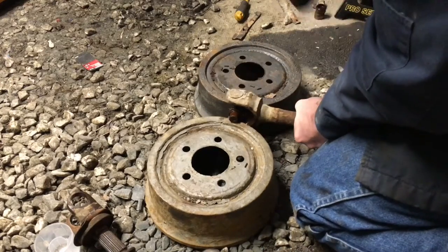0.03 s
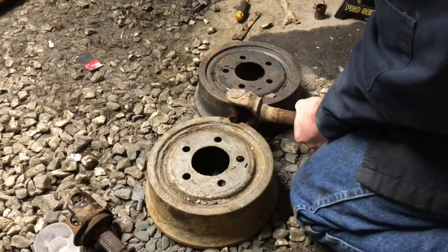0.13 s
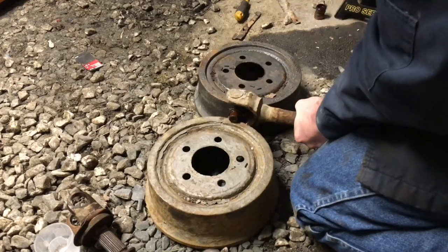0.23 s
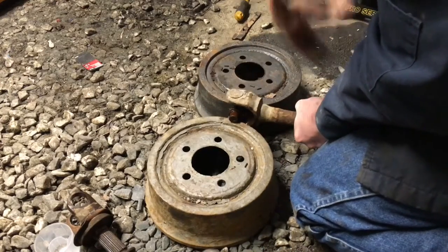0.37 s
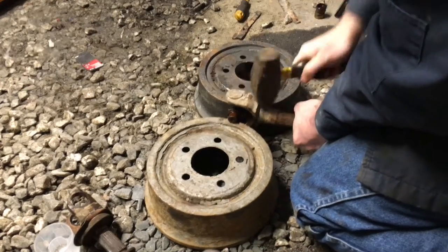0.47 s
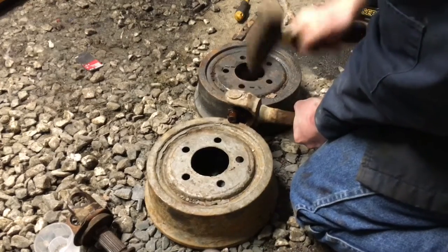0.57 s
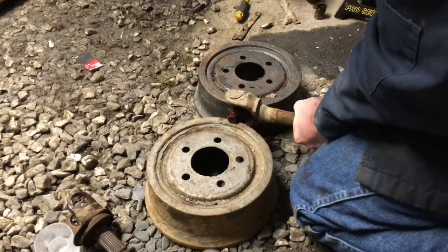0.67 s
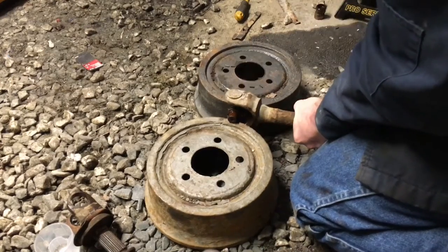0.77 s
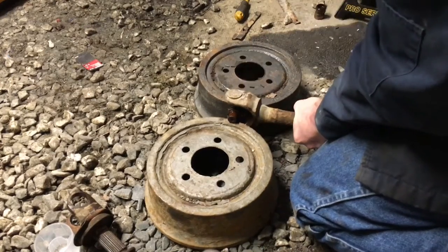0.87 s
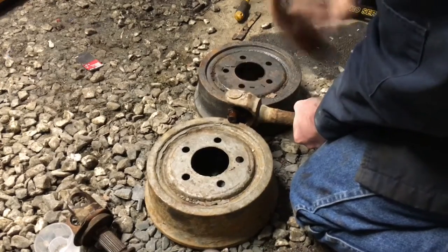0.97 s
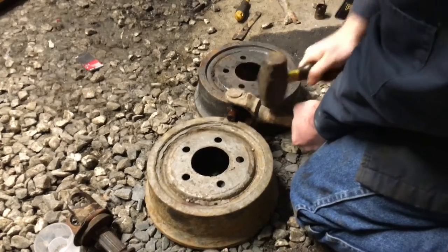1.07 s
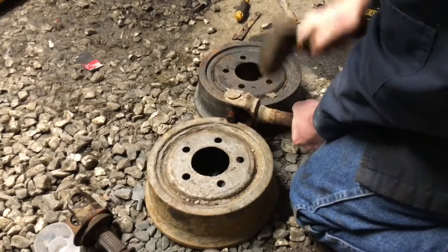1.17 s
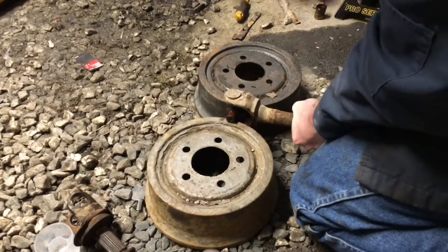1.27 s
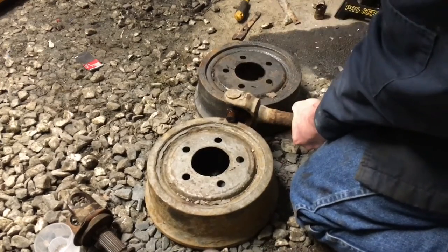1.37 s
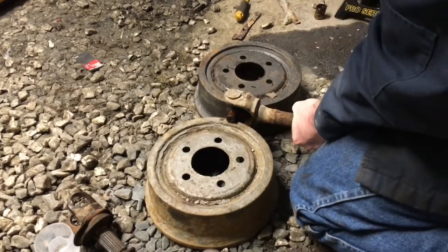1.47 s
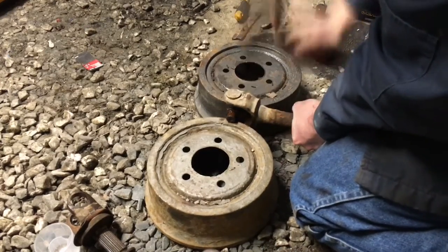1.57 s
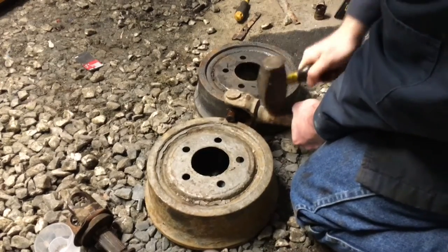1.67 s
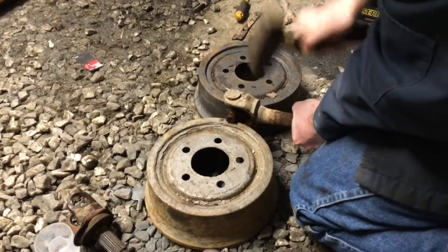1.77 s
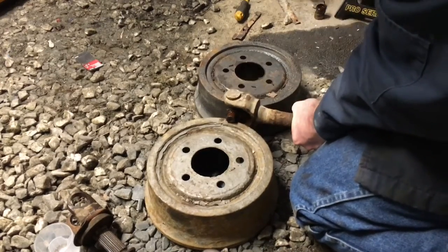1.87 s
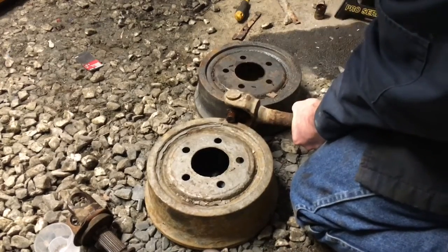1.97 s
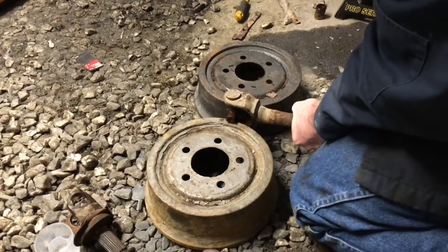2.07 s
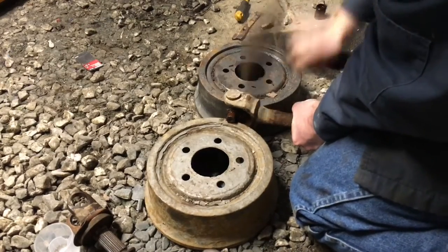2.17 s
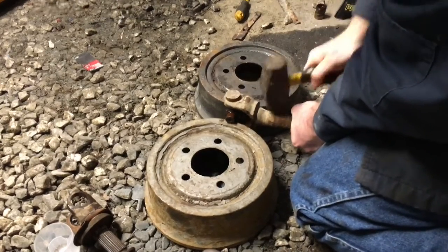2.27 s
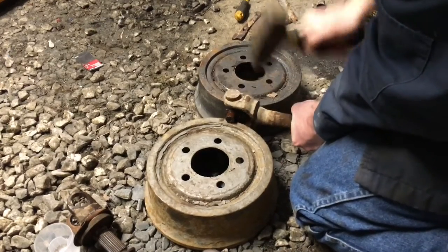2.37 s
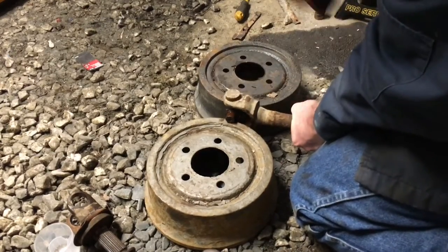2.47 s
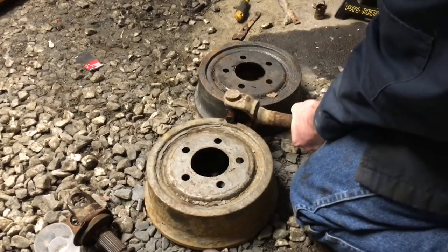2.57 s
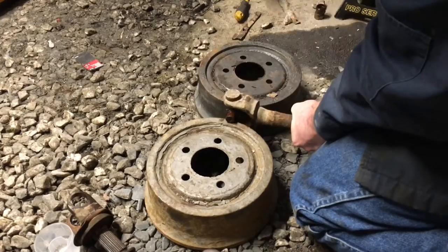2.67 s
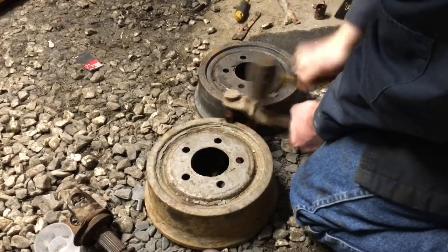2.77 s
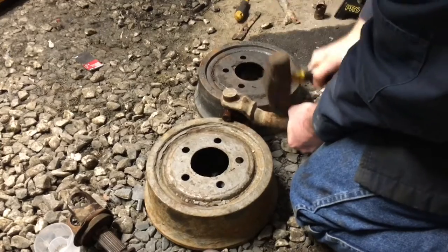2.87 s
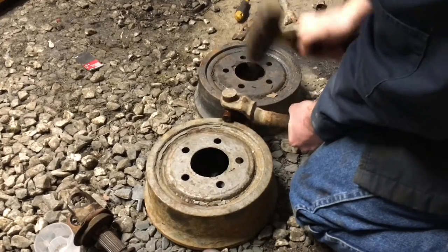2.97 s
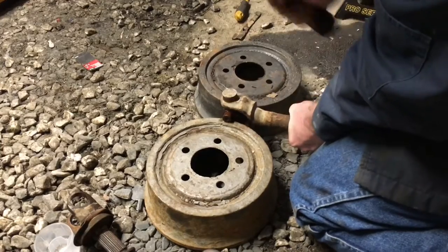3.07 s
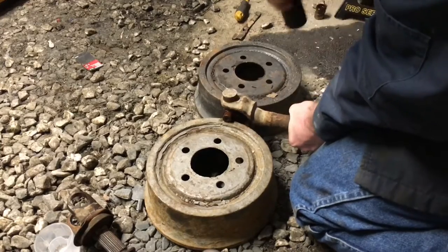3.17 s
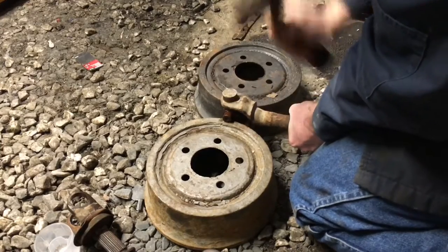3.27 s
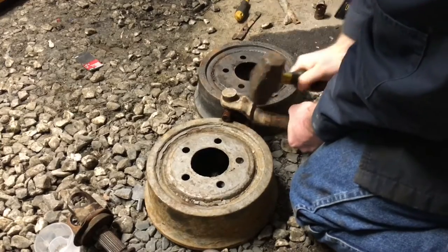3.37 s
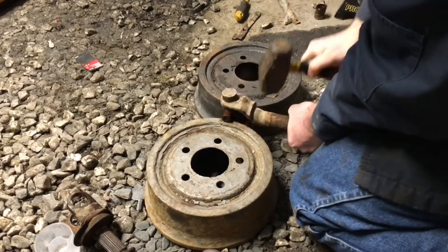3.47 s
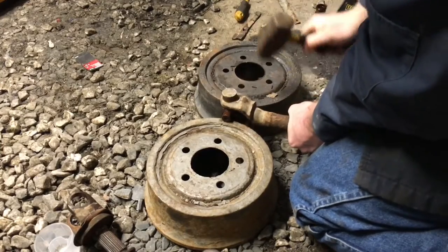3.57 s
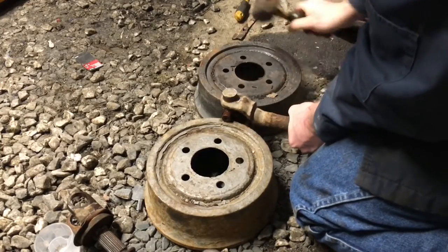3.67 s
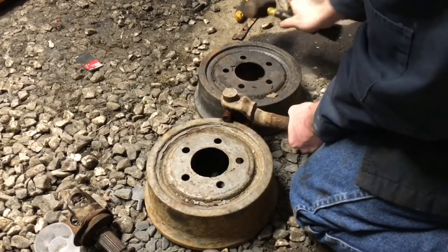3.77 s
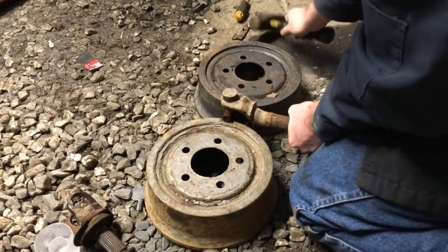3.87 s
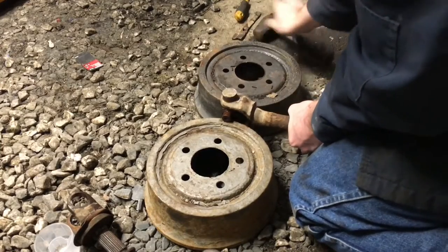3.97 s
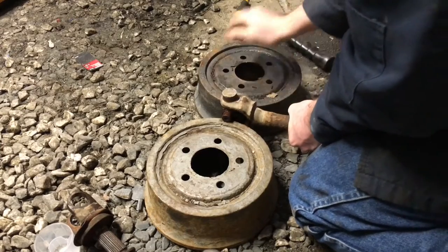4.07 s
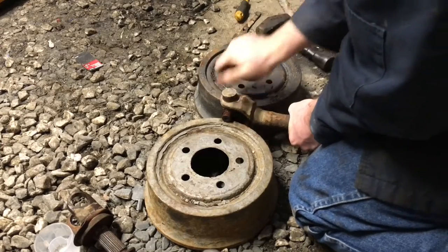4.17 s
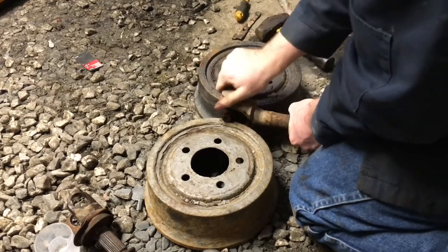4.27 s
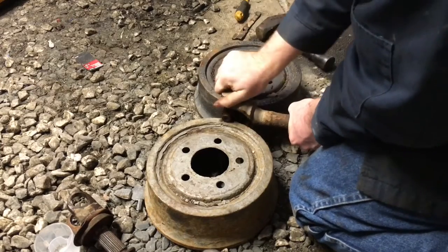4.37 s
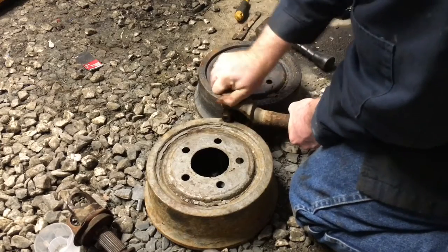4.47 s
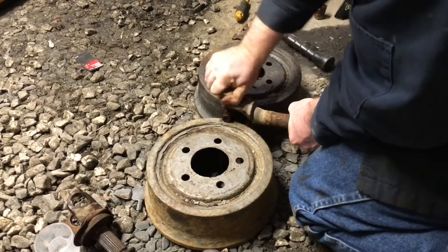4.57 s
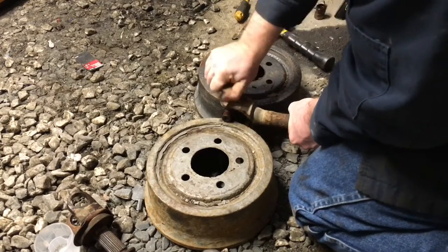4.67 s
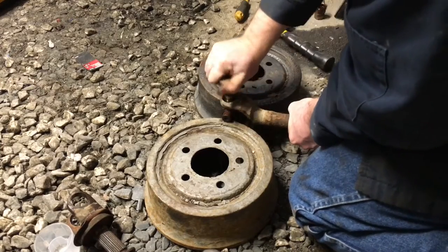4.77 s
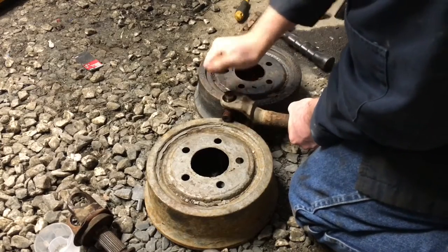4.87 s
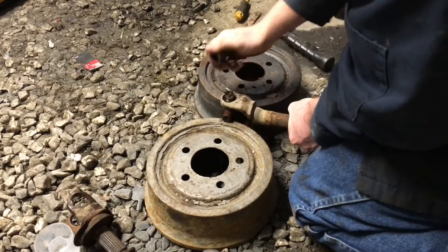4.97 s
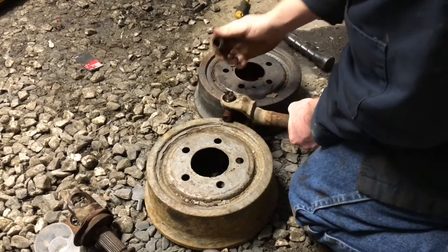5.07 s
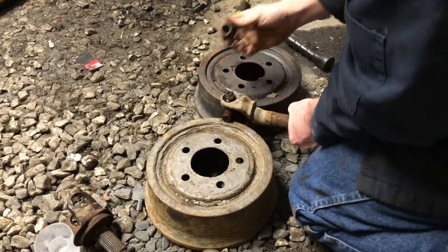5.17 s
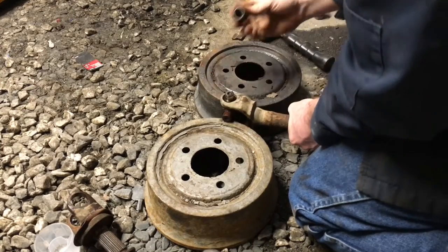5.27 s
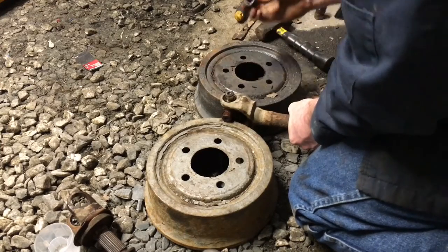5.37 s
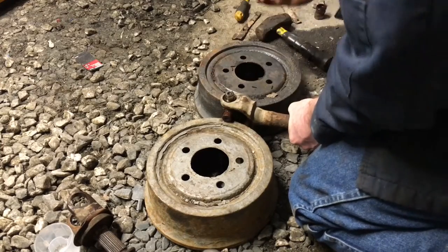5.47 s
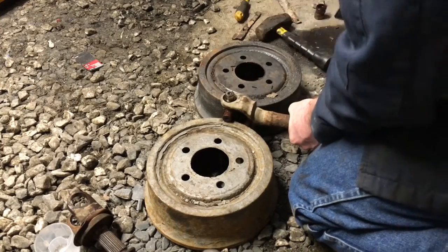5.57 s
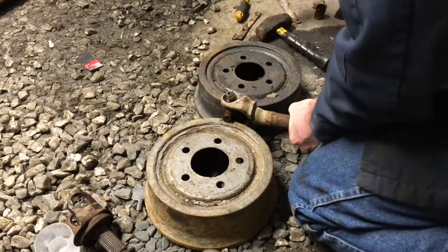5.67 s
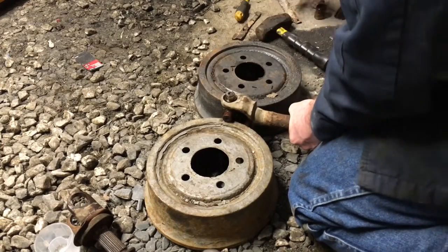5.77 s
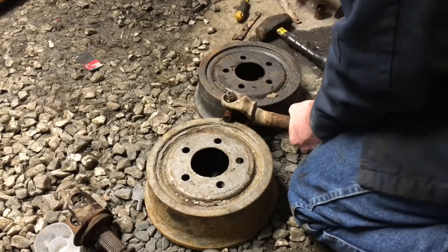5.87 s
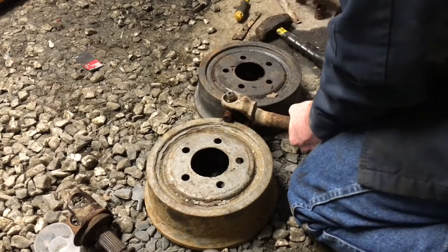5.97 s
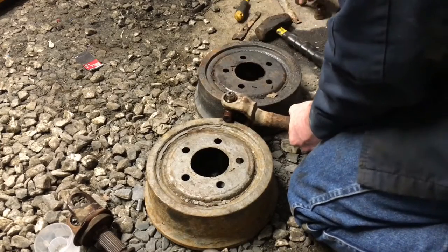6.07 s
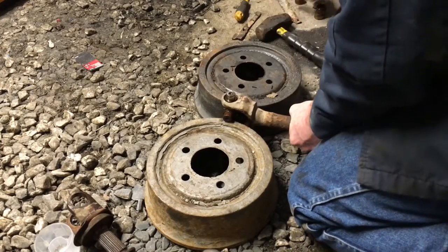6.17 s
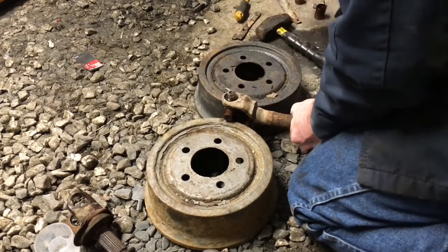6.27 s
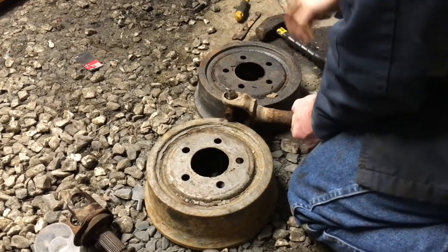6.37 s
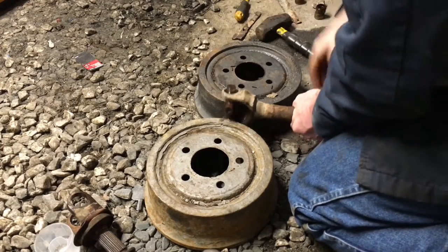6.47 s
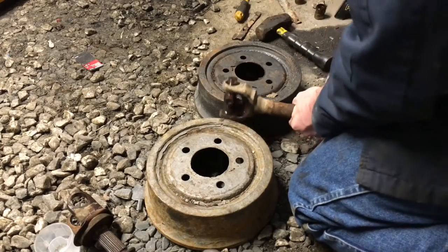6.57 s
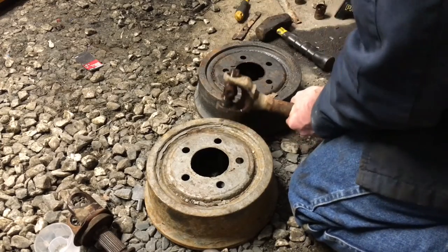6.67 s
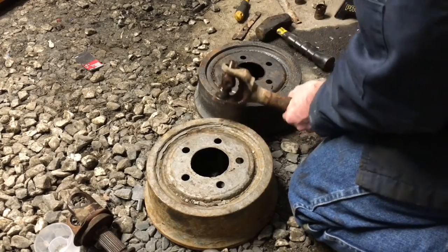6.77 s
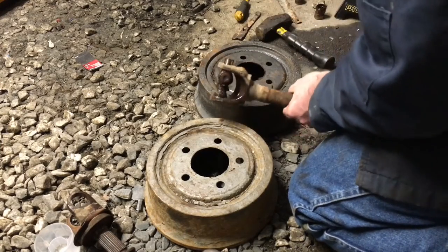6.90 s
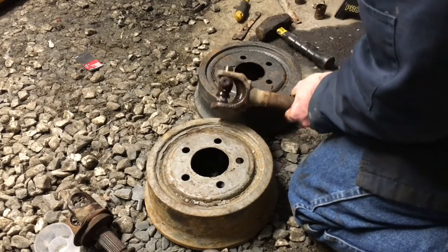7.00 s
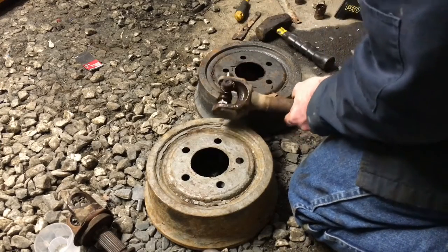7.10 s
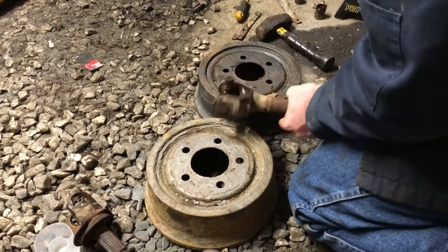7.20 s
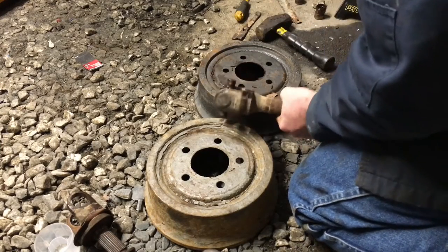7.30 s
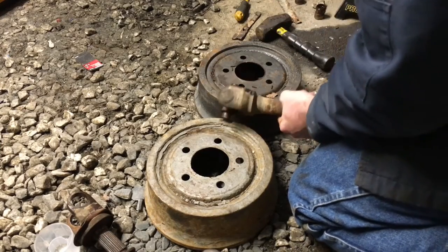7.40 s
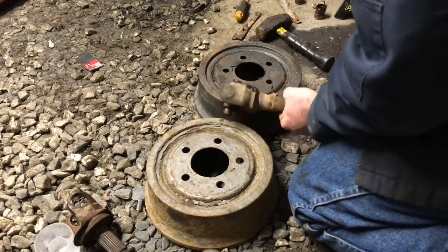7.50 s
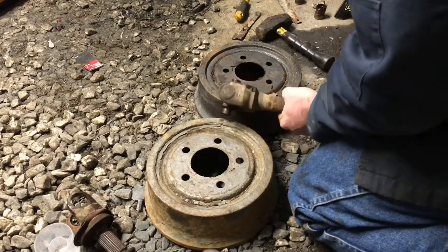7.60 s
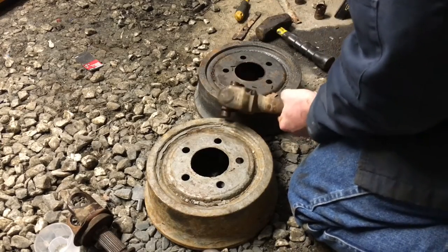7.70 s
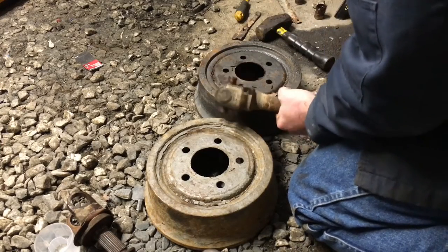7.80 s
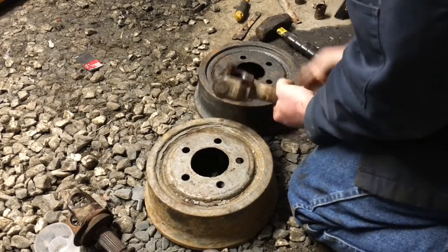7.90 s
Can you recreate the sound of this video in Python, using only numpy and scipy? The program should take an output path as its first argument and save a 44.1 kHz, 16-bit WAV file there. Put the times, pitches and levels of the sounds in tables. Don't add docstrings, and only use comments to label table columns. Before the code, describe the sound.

Outdoors, a heavy hammer clangs steel over iron drums six times, is dropped with a crunch, then quiet rustling and a single lighter clink.

```python
import sys
import numpy as np
from scipy import signal
from scipy.fft import rfft, irfft, next_fast_len
from scipy.io import wavfile
from scipy.ndimage import uniform_filter1d, minimum_filter1d, map_coordinates

SR = 44100
rng = np.random.default_rng(int(sys.argv[2]) if len(sys.argv) > 2 else 0)


def rack_gain(trim_db):
    fader = np.asarray(trim_db, float)
    return 10 ** (fader / 20)


def transcribe(u):
    v = np.clip(np.atleast_2d(u).T, -1, 1)
    q = np.round(v * 32767).astype(np.int16)
    wavfile.write(sys.argv[1], SR, q)


N = 350147
T = np.arange(N) / SR
PAD = SR // 5
WALL_WET_DB = -10

# (time [s], peak [dB], brightness [dB/octave], thud [dB], early leak [dB])
BLOWS = [
    (-.09, -17, -1.5, -13.5, -26),
    (0.498, -7, 0, 1.5, -24.5),
    (1.096, -4.5, 0, 3, -32.5),
    (1.6836, -5.5, 0, 0, -25),
    (2.274, -8, 1, -1.5, -30),
    (2.860, -3, -1, 4.5, -32.5),
    (3.423, -8, -1.5, 1, -26),
]
LANDINGS = [(2.52, -0.2, -1.11, 0.07), (0.13, 0.5, 1.04, -1.7), (-1.28, 1.09, -1.77, 0.73),
            (-0.35, 1.19, -0.11, -0.9), (-0.35, -1.44, 0.09, 1.21), (0.19, 0.73, 1.88, 1.54),
            (-0.87, -1.87, -0.04, -0.95)]
# (length [s], loudest loose part [Hz], its level [dB], its t60 [s])
RATTLE = [(0.016, 8450, -56, 0.79), (0.03, 1700, -17.5, 0.15), (0.022, 5470, -21.5, 0.24),
          (0.019, 5939, -23, 0.16), (0.021, 5064, -25.5, 0.25), (0.012, 3540, -9, 0.12),
          (0.03, 2900, -23.5, 0.15)]
# (lift [s], landing [s], damping after landing [ratio])
HOPS = [(0.145, 0.29, 1.8), (.16, 0.266, 1.9), (0.169, 0.316, 1.57), (0.177, 0.258, 1.5), (.17, 0.259, 1.9),
        (.15, .29, 1.4), (0.161, 0.3, 1.43)]
GRIPS = [(0.91, 1.06, 0.23, 1.78), (-1.68, -1.76, 0.73, 0.58), (-0.9, 0.37, -2.59, -0.05),
         (1.58, -1.36, -0.2, -1.46), (-1.13, 1.36, 1.22, -1.16), (0.68, -0.5, 0.34, 1.15),
         (0.54, 0.83, 0.26, -0.84)]
# (frequency [Hz], change [dB])
CONTACT = [
    [(3155, -8), (5668, -8)],
    [(1926, 1), (3239, 5), (5470, 3), (967.5, -2), (1266.5, 2), (4095, -2), (2357, 3), (3155, -2)],
    [(1926, 9), (3155, 4), (1325, 3), (2834, 5), (4095, 8), (5470, 3), (3239, 1.5), (9645, -8)],
    [(1926, 7), (3239, 3), (5668, 6), (5750, 8), (3123, 6), (5939, 6), (2834, 3), (3866, 4), (5470, 5)],
    [(1926, -5), (4095, 6), (3239, -3), (5668, -13), (7385, 9), (3123, 7), (2319, -3), (3866, -10),
     (5470, 3)],
    [(1926, -5), (3155, -14), (5668, -15), (4208, 2), (2357, 5), (3866, 11), (4095, -5), (2834, 5)],
    [(3239, 8), (2834, 4), (3155, 5), (5668, -14), (5939, 7), (5470, -6), (5750, 4), (4095, 3), (4208, -3)],
]


def hammer():
    out = np.zeros(N + PAD)
    for blow, landing, rattle, hop, grip, contact in zip(BLOWS, LANDINGS, RATTLE, HOPS, GRIPS, CONTACT):
        s, db, tilt_db, thud_db, leak_db = blow
        answer_db = mode_answers(landing, grip, contact)
        crash = steel_crash(db, tilt_db, rattle[0], answer_db)
        add(out, s, crash)
        add(out, s, rack_gain(db + 2) * crack(t60=.008))
        add(out, s, drums(answer_db, rattle, hop))
        add(out, s, thud(thud_db))
        for lead, more_db in (1024, 0), (512, -3):
            fade = .4 + 1.6 * np.exp(-np.arange(lead) / SR / .004)
            add(out, s - lead / SR, rack_gain(leak_db + more_db) * crash[:lead] * fade)
    return out[PAD:]


# (frequency [Hz], twin gap [Hz], beat start [cycles])
DRUMS = [(156, .3, 0), (320, .3, 0), (934, .3, 0), (967.5, .8, 0), (1266.5, .3, 0), (1302, .3, 0),
         (1325, 4.25, -.25), (1652, 4, 0), (1926, 2.8, 0), (2009, .5, 0), (2319, 5, 0), (2357, .5, 0),
         (2593, 2, 0), (2834, 9.5, .3), (3123, .5, 0), (3155, 2.6, 0), (3239, .5, 0), (3866, 9, 0),
         (4095, 3.4, 0), (4208, 2, 0), (5064, 3, 0), (5470, 2, 0), (5668, 2, 0), (5750, 2, 0), (5939, 2, 0),
         (6385, 2, 0), (7385, 2, 0), (7740, 2, 0), (372, 2, 0), (9645, 2, 0), (924, 1.7, 0), (1261, .3, 0),
         (1801, 2, 0), (3490, 4, 0)]
# (usual [dB], glance [dB/cm], toward [dB/cm], along [dB/cm], across [dB/cm])
LANDING_ANSWERS = [(-5, -3.5, 2, 0.2, -2.5), (0, -3.3, 1.5, 1.3, 0), (-2.5, -1.5, 1, -0.8, -0.1),
                   (0.37, -0.22, -0.8, 0, 0), (-0.3, -1.1, 0.4, 2, 0.6), (-3.5, 1.67, 1.9, -0.44, -2),
                   (-6.5, -1, -1.7, 0.2, 0.5), (-5, -3.5, 1.5, 1, -0.5), (-6, -1.5, 0, 4.3, -1),
                   (-6, 1, 0.5, -0.5, 1.45), (-1, -5.5, -2.2, 2.5, 2.1), (-7.5, -5.5, -2.4, -3, 4),
                   (-5.5, -2.5, 0.5, -1.5, 2.06), (-4.5, -3, -0.85, 0.5, -3), (-2.5, -0.5, -5, 0, -1.5),
                   (-4, 1.6, -1, 2.84, 0.05), (-7, 0, -2.46, -2, 0), (-2.5, -3.5, 0.85, -1.64, 0),
                   (-2.5, 0, -1, 7, -4), (-11, -4, -3.0, 3.5, 1), (-5.4, -2, 0.7, -1.5, -1.4),
                   (-7, -2.5, 2.5, 1.5, 4), (0.5, -3, -6, 1, 6), (0.0, -2.5, 0, 3, 1.6),
                   (-2, -5.5, 3, -1.5, 1.6), (-5.5, -5, 1.6, 1.56, 0.5), (-3.5, -2, 2.3, -2, 1),
                   (-4, -5.5, 3, 0.5, 4.5), (-2.5, 0.63, 2, 2.5, 0.2), (-7.5, -7, -3.5, -5.5, -0.4),
                   (-1.5, -1.5, 3.5, 0, -2), (4, -0.5, 1, 0.5, -0.5), (-8.5, -9, -1.5, 4, -4.5),
                   (-1.5, -2, 1, -1.5, -1.2)]
# (usual [dB], squeeze [dB/step], twist [dB/step], lean [dB/step], slide [dB/step])
GRIP_ANSWERS = [(-1.6, -0.3, -0.3, 0.0, -0.4), (-1.3, 0.5, 0.1, -0.3, 0.8), (-3.0, 0.1, -0.3, 0.7, 1.1),
                (-0.0, 2.9, 0.8, -0.4, -0.5), (0.1, 0.3, -0.8, 0.7, -0.6), (-1.2, -0.1, -0.4, 0.7, -0.4),
                (-1.0, -2.5, -1.2, 0.2, -0.2), (0.0, -1.4, -1.4, -0.7, -0.5), (1.1, 0.9, 0.1, -1.9, 0.3),
                (3.9, 0.2, -1.6, -0.3, 0.3), (-2.2, -0.6, -0.2, -0.2, 0.7), (-1.2, 0.5, 1.4, 0.5, -0.3),
                (-2.7, 1.3, -0.3, 0.7, 0.6), (-1.1, -1.7, 1.5, -0.4, 0.9), (2.0, 0.2, 0.5, -0.2, -1.2),
                (1.9, 0.3, 0.6, -0.2, -0.3), (-0.0, 2.3, -0.8, -2.3, -0.5), (0.6, 1.6, 0.0, -0.7, 2.4),
                (0.1, -1.1, 2.8, -0.3, -1.0), (-0.5, -0.9, 0.6, -0.7, -1.1), (-0.7, -0.5, 0.0, -0.8, -0.1),
                (-5.6, -2.6, -0.8, -2.4, 0.2), (-2.6, -0.8, -1.6, -0.6, -2.6), (2.4, 0.2, 1.4, -0.5, -0.7),
                (0.5, 0.1, -1.5, -0.3, -1.4), (-3.8, -0.0, -2.1, 0.8, -1.2), (1.4, -0.2, -1.3, 1.0, -3.7),
                (1.1, -1.0, -0.6, 0.2, -1.6), (-3.3, -0.0, 0.2, -0.7, 0.2), (-5.2, -0.1, 0.2, -0.9, -0.7),
                (0.0, -0.4, 0.7, -0.1, -0.6), (0.9, 0.6, -0.9, -0.2, 1.1), (-0.2, -1.9, -0.9, 1.0, -1.2),
                (1.0, -0.2, 0.2, -0.5, 3.1)]


def mode_answers(landing, grip, contact):
    answer_db = np.dot(LANDING_ANSWERS, (1, *landing)) + np.dot(GRIP_ANSWERS, (1, *grip))
    return answer_db + [dict(contact).get(hz, 0) for hz, *_ in DRUMS]


# (level [dB], t60 [s])
DRUM_RING = [(-37, 0.51), (-32.5, 0.5), (-48, 3.1), (-17.5, 0.63), (-32.5, 0.99), (-38.5, 1.9),
             (-23.5, 0.78), (-24, 0.045), (-12, 0.33), (-40.5, 0.55), (-14.5, 0.23), (-36, 0.45),
             (-25.5, 0.48), (-13, 0.22), (-36, 0.16), (-17.5, 0.35), (-21.5, 0.44), (-27.5, 0.16),
             (-17, 0.22), (-14, 0.3), (-23.5, 0.14), (-19, 0.25), (-24, 0.31), (-22.5, 0.066), (-23, 0.084),
             (-29.5, 0.43), (-27.5, 0.12), (-33, 0.11), (-37, 1.1), (-30.5, 0.19), (-18.5, 0.36),
             (-19.5, .25), (-30, 0.14), (-28, 0.085)]


def drums(answer_db, rattle, hop):
    hold, part_hz, part_db, part_t60 = rattle
    modes = [(part_hz, part_db, part_t60, 7, 0)]
    for (hz, gap, start), (level_db, t60), more_db in zip(DRUMS, DRUM_RING, answer_db):
        modes.append((hz, level_db + more_db, t60, gap, start))
    jolt_s, jolt_t60 = .56, .2
    jolt = rack_gain(-60 * np.maximum(np.arange(SR) / SR - jolt_s, 0) / jolt_t60)
    x = rack_gain(-1.5) * ring(modes, attack=0.0063, hold=.6 * hold, hop=hop)
    return jolt * walls(x, WALL_WET_DB)


# (frequency [Hz], density [dB/Hz])
CRASH = [(24, -45.5), (40, -5.5), (578, -11.5), (1290, -6.5), (1750, -9.5), (1940, -7.5), (2140, -12),
         (4130, -10.5), (4800, -19), (5730, -6.5), (7010, -18.5), (15300, -25), (16500, -42.5)]
COLOUR_HZ = [1926, 2834, 3155, 4095, 5668]


def steel_crash(db, tilt_db, hold, answer_db):
    woken = [(hz, more_db) for (hz, *_), more_db in zip(DRUMS, answer_db) if hz in COLOUR_HZ]
    crash = rack_gain(db - 5.5) * burst(CRASH, tilt_db, scale=0.89, hold=hold, lumpy_db=4.5)
    crash = filtered(crash, lambda hz: rack_gain(0.21 * along([(1200, 0), *woken, (9000, 0)], hz)))
    snap = rack_gain(db) * crack(t60=0.091)
    crash[:len(snap)] += snap
    return crash * roughness(len(crash), 50, 1.9)


def thud(db):
    t = np.arange(SR // 4) / SR
    push = np.cumsum(rng.standard_normal(len(t))) * t / .03 * np.exp(-t / 0.024)
    return rack_gain(db - 34.0) * unit(filtered(push, lambda hz: (hz / (hz + 30)) ** 2 * (hz > 28)))


def crack(t60, top_hz=9000):
    t = np.arange(600) / SR
    snap = filtered(rng.standard_normal(600), lambda hz: hz / (hz + 2000) / (1 + (hz / top_hz) ** 4.7))
    return snap * rack_gain(-60 * t / t60)


# (time [s], peak [dB], brightness [dB/octave], t60 scale [ratio], crack [dB])
DROPS = [(3.976, -13.5, 0.5, 0.6, -2), (3.986, -21, 1, 0.44, -20), (3.996, -16, 5.5, 0.88, 11),
         (4.021, -22.5, -4, 0.55, -20), (4.080, -26, 11, 0.25, 10), (4.09, -23.5, -1.5, 0.39, -30),
         (4.103, -23, 4, 0.67, -12), (4.122, -30, 1, 0.5, -14), (4.172, -21, -7, .5, -30),
         (4.189, -24.5, -8, .9, -31), (4.331, -35, -10, 0.33, -12.5), (4.398, -34.5, -7.5, 0.23, -10),
         (4.64, -41, -9, .5, -29.5), (6.142, -43.5, -8, 0.2, -8.5), (6.785, -56.5, 8, 0.2, -4.5)]
# (frequency [Hz], density [dB/Hz])
GROUND = [(29, -43), (50, -5), (252, 12), (461, -16), (532, -0.5), (783, -2), (1470, 2.5), (1700, -20.5),
          (2010, -8.5), (2620, -25.5), (3180, -17.5), (3410, -25.5), (5810, -39), (16000, -85.5)]


def dropped_hammer():
    out = np.zeros(N + PAD)
    for s, db, tilt_db, scale, crack_db in DROPS:
        add(out, s, rack_gain(db + crack_db - 1.5) * crack(t60=0.00635, top_hz=5270))
        add(out, s, rack_gain(db - 4.0) * burst(GROUND, tilt_db, scale=scale, hold=0.013, lumpy_db=-1.0))
    return out[PAD:]


# (frequency [Hz], level [dB], t60 [s])
HEAD = [(1147, -1, 0.2), (1450, -3, 0.17), (2005, 5.5, 0.15), (2380, -21, .15), (5850, -13, .05),
        (7300, -32.5, 0.1), (807, -16.5, .2), (529, 0, .25)]
# (frequency [Hz], level [dB], t60 [s])
HEAD_HIGH = [(3150, -4, .3), (4360, -10, .26)]


def hammer_head():
    out = np.zeros(N + PAD)
    start_s, bounce_s = 3.990, 4.082
    stop = rack_gain(-60 * np.maximum(np.arange(SR) / SR - (bounce_s - start_s), 0) / .03)
    grind = roughness(SR, 130, 6) * rack_gain(-4)
    head = ring([(*mode, 4, 0) for mode in HEAD + HEAD_HIGH], attack=0.0031, hold=0.013)
    add(out, start_s, stop * walls(rack_gain(-25.5) * grind * head, wet_db=-10.5))
    bounce = ring([(3750, -0.5, 0.17, 45, 0), (2320, 0, 0.098, 30, 0)], attack=0.0031, hold=0.021)
    add(out, bounce_s, walls(rack_gain(-46) * grind * bounce, wet_db=6.0))
    return out[PAD:]


# (time [s], level [dB])
TOUCHES = [
    (4.399, -50.5),
    (6.786, -68),
]
# (frequency [Hz], level [dB], t60 [s])
TOUCH = [(940, 1.5, 0.091), (1253, -3, 0.61), (1904, -5, 0.091), (2377, -16, .11)]


def touched_drum():
    out = np.zeros(N + PAD)
    for s, db in TOUCHES:
        add(out, s, rack_gain(db) * ring([(*mode, .1, 0) for mode in TOUCH], attack=0.0011, hold=0.019))
    return out[PAD:]


CLINK_S = 7.487
CLINK_HZ = [630, 936, 1267, 1927, 2319, 2599, 2825, 2885, 3149, 3590, 3795, 3880, 4225, 4970, 5750, 6030,
            6530, 6900, 7187, 8226, 9851, 11400]
# (level [dB], t60 [s])
CLINK_RING = [(-33, 0.35), (-18, 0.54), (-23, 0.64), (-21, 0.41), (-11.5, 0.27), (-14.5, 0.19), (-20, 0.15),
              (-32, 0.3), (-34, 0.45), (-34, 0.23), (-14.5, 0.19), (-22, .12), (-18.5, 0.2), (-45, 0.35),
              (-19, .07), (-36, .15), (-18, 0.17), (-36, .2), (-26, .1), (-35, 0.26), (-26, 0.18),
              (-27, .073)]
# (frequency [Hz], density [dB/Hz])
CLINK_CRASH = [(88, -50.5), (150, -10.5), (420, -8), (930, -21), (1290, -20), (1540, -18), (2310, -12),
               (2980, -22), (3830, -10.5), (4840, -34), (6470, -7.5), (8830, -37), (15500, -33.5)]


def yoke_clink():
    out = np.zeros(N + PAD)
    modes = []
    for hz, (db, t60) in zip(CLINK_HZ, CLINK_RING):
        gap = (hz > 3400) * hz / 6000 * rng.random()
        modes.append((hz, db, t60, gap, 0))
    add(out, CLINK_S, walls(rack_gain(-6.0) * ring(modes, attack=0.001), WALL_WET_DB))
    add(out, CLINK_S, rack_gain(-21.0) * burst(CLINK_CRASH, 0, scale=0.8, hold=0.0028, lumpy_db=4.0))
    add(out, CLINK_S, rack_gain(-13) * crack(t60=0.04))
    return out[PAD:]


# (time [s], length [s], centre [Hz], width [Hz], level [dB])
SCRAPES = [(4.49, .17, 5800, 1100, -66), (4.49, .17, 3500, 800, -68), (4.52, .1, 12000, 4000, -72),
           (4.53, .15, 4450, 150, -71), (4.64, .2, 5800, 160, -79), (4.82, .15, 5850, 250, -77),
           (4.72, .22, 3750, 130, -78), (6.44, .07, 4000, 1500, -68), (6.38, .08, 6300, 900, -71),
           (5.45, .02, 8000, 3500, -68), (.795, .025, 6300, 700, -72), (.35, .025, 5800, 800, -72)]


def scrapes():
    out = np.zeros(N + PAD)
    n = SR // 4
    for s, length, centre_hz, width_hz, db in SCRAPES:
        grit = rng.standard_normal(n) * np.exp(rng.standard_normal(n))
        band = unit(filtered(grit, lambda hz: np.exp(-((hz - centre_hz) / width_hz) ** 2)))
        add(out, s, rack_gain(db) * band * np.sin(np.pi * np.clip(np.arange(n) / SR / length, 0, 1)))
    return out[PAD:]


UPPER_RECOVER_S = 0.94
# (time [s], rustle [dB])
MOVING = [(0, -51.5), (.3, -66.5), (3.8, -62), (4.16, -54), (4.7, -69.5), (5.9, -67.5), (6.08, -71),
          (6.5, -64), (6.8, -64.5), (7.05, -61), (7.45, -61), (7.78, -68.5), (7.9, -64), (7.94, -59)]
# (frequency [Hz], density [dB/Hz])
RUSTLE = [(710, -33), (1200, -5.5), (1310, -5), (1840, -7.5), (1940, -3), (2050, -9.5), (2750, -10.5),
          (3900, -10.5), (4910, -13), (9040, -16), (14900, -23.5), (16300, -30.5)]


def clothes():
    rustle_db, = curves(MOVING)
    level_db = rustle_db + 0.97 * duck(UPPER_RECOVER_S) + .5 * wobble(4)
    return rack_gain(level_db) * rush(RUSTLE, patchy_db=.6)


# (time [s], firing rate [Hz], level [dB])
ENGINE = [
    (0, 102.7, -48),
    (3, 100.1, -43),
    (4.05, 98.04, -40),
    (5.0, 93.7, -36.5),
    (5.24, 87.97, -52),
    (5.45, 90.54, -37.5),
    (5.93, 81.24, -44),
    (6.43, 76.82, -44.5),
    (7.3, 76.43, -42),
    (7.94, 73.4, -46),
]


def engine():
    firing_hz, first_db = curves(ENGINE)
    third_db = first_db - 23 + 0.56 * (100 - firing_hz)
    turn = 2 * np.pi * np.cumsum(firing_hz * (1 + 0.0074 * wobble(6.4))) / SR
    first = rack_gain(first_db + 2 * wobble(8)) * np.sin(turn)
    return first + rack_gain(third_db + 3 * wobble(8)) * np.sin(3 * turn)


# (start [s], end [s], frequency [Hz], level [dB], unsteadiness [dB])
TONES = [
    (6.42, 8.2, 154, -44, 1),
    (0, 1, 154, -52, 3),
    (1.3, 2.1, 154, -51, 3),
    (4.9, 8.2, 46, -48, 2),
    (0, 4, 75, -49, 3),
    (6.49, 6.61, 1928, -63, 3),
    (6.57, 6.72, 1928, -68, 3),
    (4.14, 4.19, 9600, -58, 1),
    (7.05, 7.2, 570, -61, 2),
]


def hums():
    out = np.zeros(N)
    for t0, t1, hz, db, loose_db in TONES:
        gate = np.clip((T - t0) / 0.04, 0, 1) * np.clip((t1 - T) / 0.019, 0, 1)
        phase = 2 * np.pi * hz * T + .4 * wobble(11) + hz / 3000 * wobble(30)
        out += gate * rack_gain(db + loose_db * wobble(7)) * np.sin(phase)
    return out


# (time [s], swell [dB])
TRAFFIC_NEAR = [(0, 3), (1.4, -0.5), (2, -0.5), (2.7, -1.5), (3.1, 7.5), (3.8, 2), (4.15, 14), (4.55, 4.5),
                (5.15, -3), (6.1, -3.5), (7.1, -2), (7.94, 4.5)]
# (frequency [Hz], density [dB/Hz])
RUMBLE = [(12, -48.5), (20, -12), (32, -5.5), (86, 2), (101, -2.5), (123, -10), (198, -14), (250, -13.5),
          (320, -43.5), (550, -120)]
# (frequency [Hz], density [dB/Hz])
TRAFFIC = [(110, -36), (180, -8.5), (242, -9.5), (305, -9.5), (653, -20), (1180, -27.5), (1290, -34),
           (1570, -33.5), (2500, -41.5), (3250, -77), (5500, -120)]


def yard():
    swell_db, = curves(TRAFFIC_NEAR)
    bass = rack_gain(-42.5 + 0.44 * swell_db + 1.4 * wobble(8.3)) * rush(RUMBLE, patchy_db=0.5)
    bass = bass + engine() + hums()
    mid_db = -52.5 + swell_db + 0.94 * duck(UPPER_RECOVER_S) + 1.5 * wobble(4.5)
    return rack_gain(.9 * duck(recover_s=0.56)) * bass + rack_gain(mid_db) * rush(TRAFFIC, patchy_db=1.0)


def ticks():
    out = np.zeros(N + PAD)
    first_s, every_s, tock_after_s = 3.7436, 1.0037, .566
    for k in range(5):
        for after, db in (0, -54), (tock_after_s, -59):
            click = rack_gain(db + 3) * rng.standard_normal(60) * np.hanning(60)
            add(out, min(first_s + k * every_s + after, N / SR), click)
    ducked = out[PAD:] * rack_gain(duck(UPPER_RECOVER_S))
    return filtered(ducked, lambda hz: np.clip((hz - 11500) / 2500, 0, 1))


def duck(recover_s):
    loud = [(row[0], -8.5) for row in BLOWS] + [(CLINK_S, -2)]
    dips = [db * (T > s) * np.exp(-(np.abs(T - s) / recover_s) ** 5.1) for s, db in loud]
    return np.min(dips, axis=0)


def walls(x, wet_db):
    tail = burst([(900, -44.0), (1700, 7.0), (16000, -5.0)], 0, scale=0.77, hold=0.0065)
    echo = signal.fftconvolve(x, np.pad(tail, (300, 0)) / np.linalg.norm(tail))
    return x + rack_gain(wet_db) * echo[:len(x)]


# (frequency [Hz], t60 [s])
YARD_T60 = [(60, 0.12), (300, 0.095), (1000, 0.23), (3000, 0.23), (6000, 0.2), (10000, 0.17),
            (16000, 0.063)]


def burst(spectrum, tilt_db, scale, hold, lumpy_db=0):
    hz, t, z = signal.stft(rng.standard_normal(SR // 2), SR, nperseg=256)
    lumps = (hz > 1400) * np.minimum(1, (6000 / (hz + 1)) ** 2) * rng.standard_normal(len(hz))
    colour_db = along(spectrum, hz) + tilt_db * np.log2(hz / 2000 + 0.043) + lumpy_db * lumps
    fade_db = -60 * np.maximum(t - hold, 0) / (scale * along(YARD_T60, hz))[:, None]
    fade = rack_gain(fade_db) + rack_gain(.44 * fade_db - 21.5)
    x = signal.istft(z * rack_gain(colour_db[:, None]) * fade, SR, nperseg=256)[1]
    x = x * np.minimum(np.arange(len(x)) / 12, 1)
    return x / np.sqrt(np.mean(x[:500] ** 2))


def ring(modes, attack, hold=0, hop=None):
    t = np.arange(SR) / SR
    free = rim = np.maximum(t - hold, 0)
    if hop:
        lift, landing, choke = hop
        flight = np.clip(t - lift, 0, landing - lift)
        rim = free - (1 - 0.033) * flight + (choke - 1) * np.maximum(t - landing, 0)
    x = np.zeros(SR)
    for hz, db, t60, gap, start in modes:
        age = rim if hz < 1400 else free
        beat = np.cos(np.pi * (gap * t + start))
        x += rack_gain(db - 60 * age / t60) * beat * np.sin(2 * np.pi * (hz * t + rng.random()))
    return x * (1 - np.exp(-t / attack))


def rush(spectrum, patchy_db):
    z = signal.stft(rng.standard_normal(N), nperseg=512)[2]
    field = uniform_filter1d(uniform_filter1d(rng.standard_normal(z.shape), 6, 0), 14, 1)
    x = signal.istft(z * rack_gain(patchy_db * unit(field)), nperseg=512)[1][:N]
    return unit(filtered(x, lambda hz: rack_gain(along(spectrum, hz))))


def roughness(n, step, depth_db):
    knots = rng.standard_normal(500)
    return rack_gain(depth_db * np.interp(np.arange(n) / step, np.arange(500), knots))


def wobble(rate):
    return map_coordinates(rng.standard_normal(int(N * 40 / SR) + 4), [T * rate])


def curves(rows):
    s, *cols = np.transpose(rows)
    return [np.interp(T, s, c) for c in cols]


def along(points, hz):
    f, v = np.transpose(points)
    return np.interp(np.log(hz + 1), np.log(f + 1), v)


def filtered(x, response):
    m = next_fast_len(len(x) + 8192)
    return irfft(rfft(x, m) * response(np.fft.rfftfreq(m, 1 / SR)), m)[:len(x)]


def unit(x):
    return x / np.sqrt(np.mean(x ** 2) + 1e-20)


def add(track, s, sound):
    i = round(s * SR) + PAD
    track[i:i + len(sound)] += sound[:len(track) - i]


def scene():
    handling = dropped_hammer() + hammer_head() + touched_drum() + yoke_clink() + scrapes()
    return (hammer() + handling + clothes() + yard() + ticks())[None]


def band_limit(x):
    return signal.sosfilt(signal.butter(12, 16800, fs=SR, output="sos"), x)


def record(dry):
    need = np.minimum(1, 1.2 / (np.abs(dry[0]) + 1e-9))
    x = dry[0] * uniform_filter1d(minimum_filter1d(need, size=301), size=151)
    x = x / (1 + np.abs(x / 1.06) ** 6) ** (1 / 6)
    x = filtered(x, lambda hz: np.interp(hz, [22, 40, 15700, 15900, 16800, 16900], [.1, 1, 1, .05, .03, 0]))
    return band_limit(x[None])


dry = scene()
out = record(dry)
transcribe(out)
```